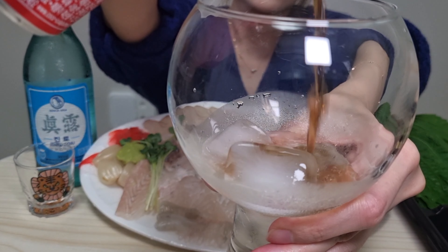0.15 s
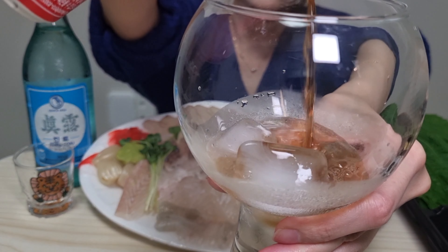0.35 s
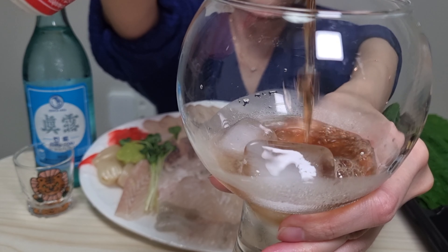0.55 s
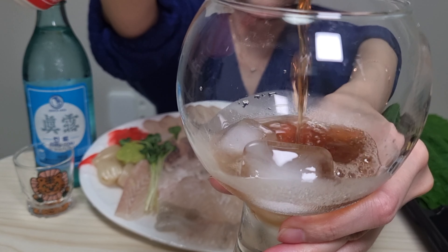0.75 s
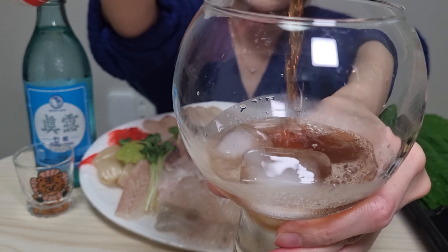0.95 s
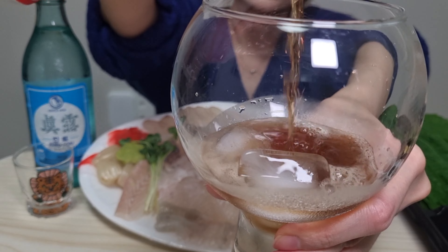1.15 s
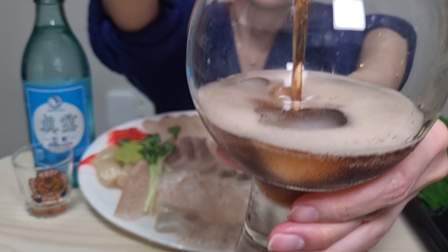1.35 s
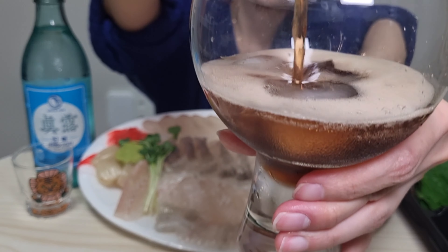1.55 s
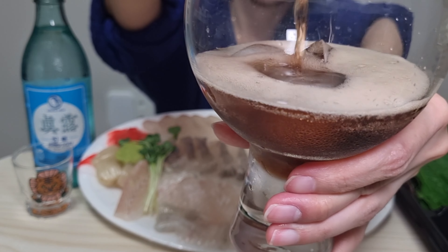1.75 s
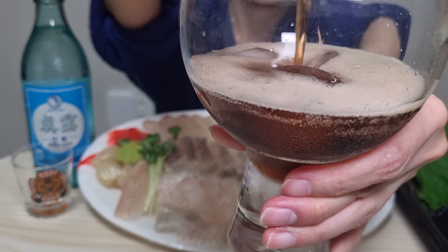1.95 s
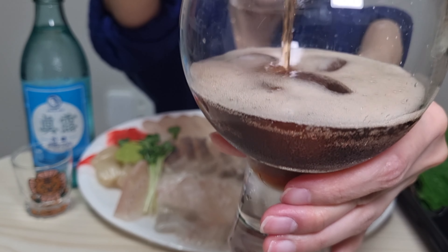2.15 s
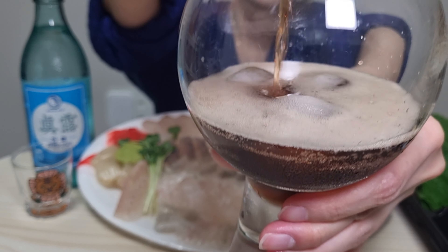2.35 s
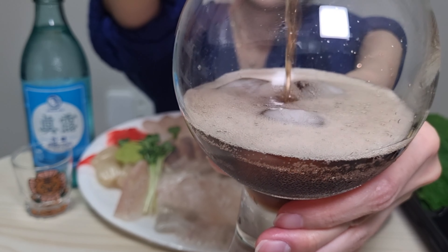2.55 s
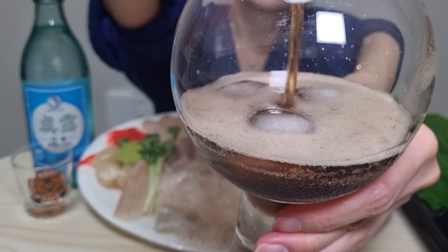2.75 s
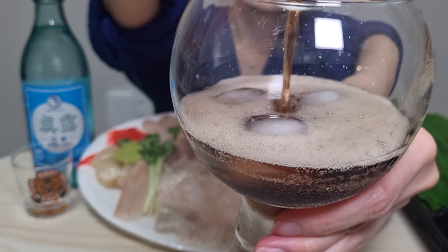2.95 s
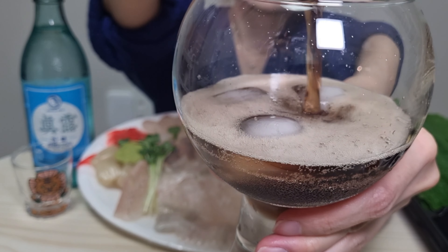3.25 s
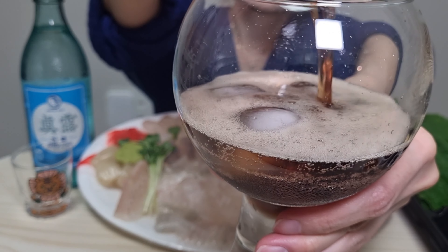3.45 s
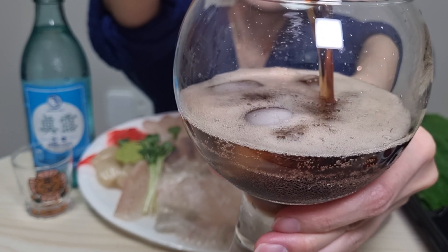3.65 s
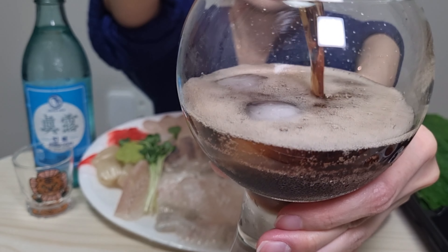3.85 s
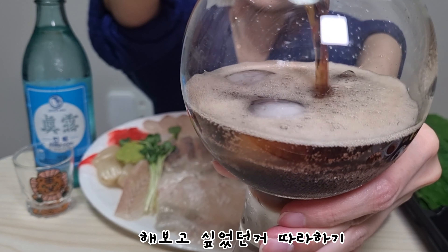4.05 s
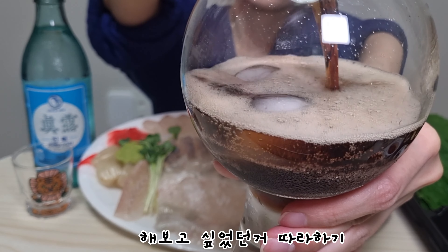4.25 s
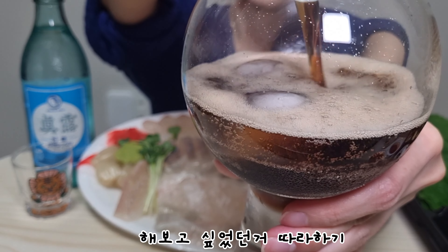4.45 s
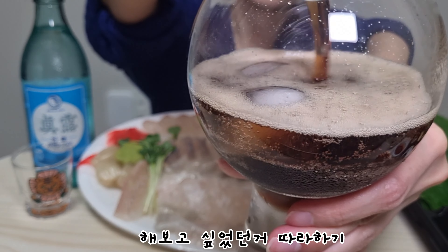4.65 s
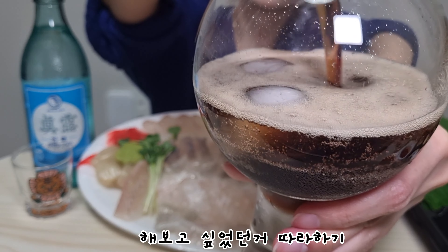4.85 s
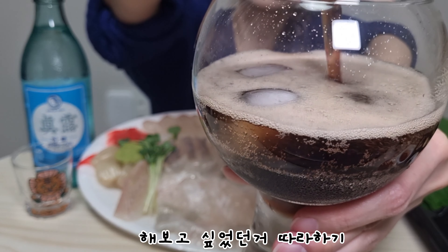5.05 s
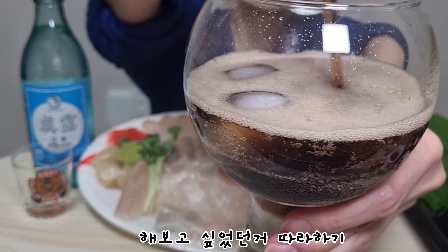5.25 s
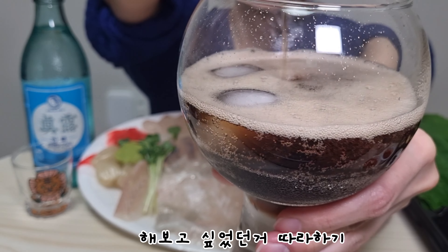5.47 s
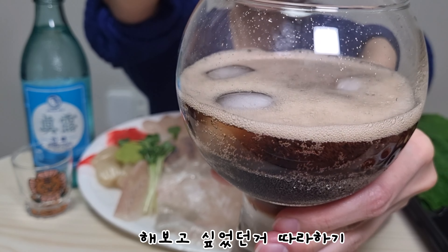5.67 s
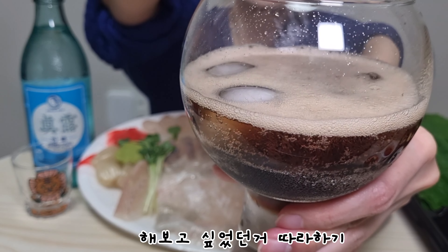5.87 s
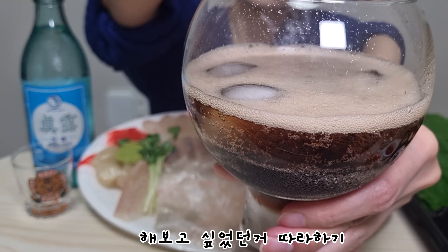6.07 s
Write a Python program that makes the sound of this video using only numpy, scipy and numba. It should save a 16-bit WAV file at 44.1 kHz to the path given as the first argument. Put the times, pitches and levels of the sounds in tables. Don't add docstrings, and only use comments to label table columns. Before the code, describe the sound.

Close stereo pickup of soda poured into a large round glass. A thin jet spatters crisply on bare ice with a hollow plop, then abruptly the sound changes to floating ice knocking the glass, a strong burst of gulping glugs and squeaky spits, and bubbling foam. Several loud clear clinks follow, then only ringing fizz remains over a faint kitchen hum.

```python
import sys
import numpy as np
from scipy import signal
from scipy.fft import rfft, irfft, next_fast_len
from scipy.io import wavfile
from numba import njit

SR = 44100
rng = np.random.default_rng(int(sys.argv[2]) if len(sys.argv) > 2 else 0)


def gain_from_db(level_db):
    decades = np.asarray(level_db, float) / 20
    return 10 ** decades


def master_out(mix):
    frames = np.transpose(np.atleast_2d(mix))
    ceiling = np.clip(frames, -1, 1)
    pcm = np.round(ceiling * 32767).astype(np.int16)
    wavfile.write(sys.argv[1], SR, pcm)


N = 335907
SECONDS = np.arange(N) / SR
CUT_S = 1.337
LAG_SAMPLES = 3.76
LEFT_RIGHT = np.array([[1], [-1]])


def rms_one(x):
    return x / np.sqrt(np.mean(x ** 2) + 1e-20)


def in_time(rows):
    s, *columns = np.transpose(rows)
    return [np.interp(SECONDS, s, c) for c in columns]


def band(x, low_hz, high_hz):
    return signal.sosfilt(signal.butter(2, [low_hz, high_hz], "band", fs=SR, output="sos"), x)


def colour(x, spectrum):
    hz, level_db = np.transpose(spectrum)
    size = next_fast_len(N)
    log_hz = np.log(np.arange(size // 2 + 1) * SR / size + 1)
    gain = gain_from_db(np.interp(log_hz, np.log(hz), level_db, -80, -80))
    return rms_one(irfft(rfft(x, size) * gain, size)[..., :N])


def drift(rate):
    r = np.exp(-80 * np.pi * rate / SR)
    slow = signal.lfilter([1], [1, -2 * r, r * r], rng.standard_normal(N // 40 + 2002))[2000:]
    return np.interp(np.arange(N) / 40, np.arange(len(slow)), rms_one(slow))


@njit
def resonate(x, hz, width_hz, sr):
    out, r = np.zeros_like(x), np.exp(-np.pi * width_hz / sr)
    for i in range(2, len(x)):
        drive = (1 - r * r) / 2 * (x[i] - x[i - 2])
        out[i] = drive + 2 * r * np.cos(2 * np.pi * hz[i] / sr) * out[i - 1] - r * r * out[i - 2]
    return out


def crackle(per_s, spread_db):
    sizes = gain_from_db(spread_db * np.minimum(rng.exponential(1, N), 5)) * rng.choice([-1., 1.], N)
    return rms_one(sizes * (rng.random(N) < per_s / SR))


def pair(near, own, alike):
    late = np.interp(np.arange(len(near)) - LAG_SAMPLES, np.arange(len(near)), near)
    alike = np.clip(alike, 0, 1)
    return np.sqrt(alike) * np.array([near, late]) + np.sqrt(1 - alike) * own


def ping(t, hz, t60, rise_s, glide=0.):
    t = np.maximum(t, 0)
    return np.sin(2 * np.pi * hz * t * (1 + glide * t)) * gain_from_db(-60 * t / t60) * (1 - np.exp(-t / rise_s))


def dying(x, t, t60):
    return x * gain_from_db(-60 * t / t60)


def add(out, s, sound):
    i = round(s * SR)
    out[:, i:i + sound.shape[1]] += sound[:, :N - i]


def event_time(length_s):
    return (np.arange(round(length_s * SR)) - np.array([[0], [LAG_SAMPLES]])) / SR


def swell(start_s, attack_s, end_s, release_s, boost_db):
    lengths_s = [start_s, abs(attack_s), abs(end_s - start_s - attack_s), abs(release_s)]
    return np.interp(SECONDS, np.cumsum(lengths_s), [0, boost_db, boost_db, 0])


# (frequency [Hz], density [dB per Hz])
ROOM_AIR = [(12, -72), (20, -36), (27, -36), (42, -19.5), (64, -16), (87, -19), (106, 11), (119, -13),
            (363, -18), (595, -28.5), (900, -17), (1170, -37.5), (1980, -120)]
# (frequency [Hz], width [Hz], level [dB])
FRIDGE = [(93.2, 3.84, -54), (60, 13, -66)]


def kitchen():
    right = gain_from_db(-3.2 * LEFT_RIGHT)
    out = gain_from_db(-62.5) * colour(pair(rng.standard_normal(N), rng.standard_normal((2, N)), 0.14), ROOM_AIR)
    (hum_hz, wobble_hz, hum_db), (rumble_hz, width_hz, rumble_db) = FRIDGE
    turns = np.cumsum(hum_hz + wobble_hz * drift(6)) / SR
    out += right * gain_from_db(hum_db + 2.2 * drift(40)) * np.sin(2 * np.pi * turns)
    rumble = pair(rng.standard_normal(N), rng.standard_normal((2, N)), 0.81)
    return out + right * gain_from_db(rumble_db) * rms_one(band(rumble, rumble_hz - width_hz, rumble_hz + width_hz))


def follow(foam_db, mean_db, share, db_per_s):
    return mean_db + share * (foam_db + 46) + db_per_s * (SECONDS - 4)


# (time [s], level [dB])
FOAM_LEVEL = [(1.34, -54), (2.2, -53), (2.42, -34), (2.6, -40), (3.1, -45), (3.85, -45.5), (4.05, -51.5),
              (4.7, -48), (5.1, -44), (6.1, -41), (6.8, -43.5), (7.62, -47.5)]
# (time [s], pitch [Hz])
AIR_RISES = [(2.6, 935), (4.8, 1072)]
# (frequency [Hz], width [Hz], level [dB])
BOWL_MODES = [(1070, 116, 0), (1600, 300, -9.5), (2250, 67, -1), (3290, 370, -10), (4340, 240, -23.5)]
# (time [s], pitch [Hz])
UPPER_SHIFT = [(1.4, 2250), (2, 2180), (3.2, 2160), (5.3, 2220), (7.6, 2200)]
# (level at mean foam level [dB], share of its swing, thickening head [dB per s])
UPPER_FOLLOWS = (-48.5, .4, -.8)
HISS_FOLLOWS = (-50, .2, -.3)
# (frequency [Hz], density [dB per Hz])
FIZZ = [(540, -34), (760, -16), (1300, -12), (1670, -10.5), (2220, 0.5), (2520, -6), (4080, -12),
        (8170, -14), (10600, -19), (12600, -13.5), (14900, -18), (16000, -13)]


def foam():
    (air_hz,), (bowl_db,) = in_time(AIR_RISES), in_time(FOAM_LEVEL)
    upper_db, hiss_db = follow(bowl_db, *UPPER_FOLLOWS), follow(bowl_db, *HISS_FOLLOWS)
    pops = pair(crackle(1600, 2.8), rng.standard_normal((2, N)), 0.45)
    fine = pair(crackle(4000, 3.5), rng.standard_normal((2, N)), 0.51)
    (_, width_hz, _), *upper = BOWL_MODES
    wide_hz = 2 * width_hz
    bowl = np.array([resonate(resonate(x, air_hz, wide_hz, SR), air_hz, wide_hz, SR) for x in pops])
    shift = in_time(UPPER_SHIFT)[0] / upper[1][0]
    ring = np.zeros((2, N))
    for k, (hz, mode_width_hz, level_db) in enumerate(upper):
        mode = np.array([resonate(x, hz * shift, mode_width_hz, SR) for x in fine])
        ring += gain_from_db(level_db) * (-1) ** k * mode
    hiss = colour(pair(crackle(7000, 2.7), rng.standard_normal((2, N)), 0.1), FIZZ)
    out = gain_from_db(bowl_db + 1.3 * drift(9)) * rms_one(bowl)
    out += gain_from_db(upper_db - 0.5 + 2.3 * drift(26.2)) * rms_one(ring)
    out += gain_from_db(hiss_db + 5.5 + 0.89 * drift(25)) * hiss
    return out * np.clip((SECONDS - CUT_S) / 0.012, 0, 1)


# (time [s], pitch [Hz])
NECK = [(1.63, 409), (1.9, 445), (2.25, 560), (2.47, 719), (2.57, 759), (2.68, 570), (2.9, 405),
        (3.01, 390), (3.1, 350), (3.36, 340), (3.8, 385), (4.44, 402), (4.58, 435), (5.4, 465)]
# (time [s], level [dB])
GULPED_AIR = [(2.3, -72), (2.4, -40), (2.5, -36), (2.64, -42), (2.8, -45), (2.85, -53), (2.89, -45),
              (3.01, -46), (3.04, -64), (3.5, -63), (3.85, -62), (3.95, -80), (4.25, -82)]
# (time [s], level [dB])
UPPER_WAKES = [(2.42, -24), (2.63, 2), (2.9, -2), (3.1, 6), (3.5, 3), (3.85, 7), (3.95, 22)]


def gurgle():
    (neck_hz,), (level_db,), (upper_db,) = in_time(NECK), in_time(GULPED_AIR), in_time(UPPER_WAKES)
    neck_hz = neck_hz * (1 + .04 * np.sign(drift(9)) * np.abs(drift(4)))
    gulps = crackle(400, 2.8) * gain_from_db(1.6 * drift(22))
    first = rms_one(resonate(resonate(gulps, neck_hz, 38.0, SR), neck_hz, 75.0, SR))
    upper_hz = neck_hz * np.interp(SECONDS, [3.15, 3.5], [2.05, 1.7])
    second = rms_one(resonate(resonate(gulps, upper_hz, 63.0, SR), upper_hz, 140.0, SR))
    sound = gain_from_db(level_db) * first + gain_from_db(level_db + upper_db) * second
    sound *= np.interp(SECONDS, [2.28, 2.33, 4.22, 4.4], [0, 1, 1, 0])
    return np.array([sound, np.roll(sound, 11)])


# (time [s], length [s], centre [Hz], level [dB])
SQUEAKS = [(2.342, 0.058, 8600, -40), (2.405, .06, 8500, -37), (2.47, 0.063, 9000, -33),
           (2.661, .04, 6500, -41.5), (2.733, 0.045, 6500, -40), (2.78, 0.05, 6900, -41),
           (3.195, 0.05, 310, -50), (3.22, 0.08, 255, -52), (3.275, 0.065, 330, -51), (3.29, .06, 250, -52),
           (3.14, 0.04, 350, -52)]


def squeaks():
    out, grit = np.zeros((2, N)), crackle(900, 4.0)
    for s, length_s, hz, level_db in SQUEAKS:
        t, i = event_time(length_s), round(s * SR)
        sputter = pair(grit[i:i + t.shape[1]], rng.standard_normal(t.shape), 0.6)
        add(out, s, gain_from_db(level_db - 11 * t / length_s) * rms_one(band(sputter, 0.93 * hz, 1.06 * hz)))
    return out


# (time [s], peak [dB], pitch [Hz])
BUBBLES = [(2.3687, -28, 2210), (2.3846, -22, 1470), (2.431, -28, 1600), (2.461, -28, 2220),
           (2.5123, -29, 1480), (2.5378, -30, 1330), (2.5533, -28, 1400), (2.578, -30, 1000),
           (2.5917, -28, 2090), (2.6371, -25, 1600), (2.6525, -23, 1770), (2.6929, -30, 1450),
           (2.798, -30, 1400), (2.8815, -31, 1600), (2.927, -33, 1400), (2.9948, -33, 1350),
           (3.008, -34, 1400), (3.0905, -25, 1500), (3.117, -33, 1450), (3.14, -34, 950),
           (3.208, -34, 1000), (3.226, -35, 1000), (3.243, -35, 850), (3.311, -31, 1000),
           (3.311, -36, 2150), (3.339, -36, 1600), (1.957, -31, 930), (1.94, -33, 950), (4.105, -36, 700),
           (5.466, -26, 1000), (4.33, -22, 960), (4.339, -26, 1000), (4.377, -20, 1020), (4.449, -21, 1050),
           (3.916, -17, 960)]


def bubbles():
    out, t = np.zeros((2, N)), event_time(0.22)
    for s, peak_db, hz in BUBBLES:
        add(out, s, gain_from_db(peak_db + 3) * ping(t, hz, 0.028, 0.0012, glide=2.5))
    return out


# (time [s], peak [dB], centre [Hz])
SPITS = [(2.325, -36, 13000), (2.386, -34, 6200), (2.408, -33, 6300), (2.431, -36, 7000),
         (2.45, -36, 13000), (2.474, -30, 9500), (2.485, -34, 14000), (2.512, -34, 13500),
         (2.727, -37, 11000), (2.733, -31, 6600), (2.782, -35, 6800), (2.808, -35, 13000)]


def spits():
    out, t = np.zeros((2, N)), event_time(0.02)
    for s, peak_db, hz in SPITS:
        spit = band(dying(rng.standard_normal(t.shape), t, 0.012), 0.8 * hz, min(1.2 * hz, 17000))
        add(out, s, gain_from_db(peak_db + 9) * spit)
    return out


# (time [s], ring [dB], pitch [Hz], click against ring [dB], rise [per s])
TICKS = [
    (.336, -27, 1050, -40, 35),
    (.378, -16, 2250, -40, 22),
    (1.319, -48, 400, 21, 0),
    (2.409, -29, 3200, 9, 0),
    (3.052, -50, 9000, 27, 0),
    (4.397, -24, 2600, 3, 0),
    (4.589, -31, 5400, -30, 0),
]


def ticks():
    out, t = np.zeros((2, N)), event_time(0.22)
    for s, peak_db, hz, click_db, glide in TICKS:
        click = band(dying(rng.standard_normal(t.shape), t, .004), 400, 16000)
        add(out, s, gain_from_db(peak_db) * (ping(t[:1], hz, .04, .001, glide) + gain_from_db(click_db) * click))
    return out


# (time [s], thin ring [dB], wall mode [dB], click [dB], thud [dB])
HARD_BLOWS = [
    (1.902, -60, -45, -20, -50),
    (3.904, -29, -22, -8, -12),
    (4.317, -48, -36, -32, -22),
    (4.398, -35, -36, -30, -40),
    (4.442, -50, -30, -27, -27),
    (4.589, -45, -45, -30, -36),
    (5.43, -37, -30, -6, -13),
]


def glass():
    out, t = np.zeros((2, N)), event_time(0.22)
    click = ping(t, 1550, 0.012, 0.0004) + 0.4 * ping(t, 2800, 0.008, 0.0003)
    click += 0.35 * ping(t, 3750, 0.008, 0.0003)
    for s, thin_db, wall_db, click_db, thud_db in HARD_BLOWS:
        sound = gain_from_db(thin_db) * ping(t, 4366, 0.24, 0.002) + gain_from_db(wall_db) * ping(t, 727, 0.15, 0.002)
        sound += gain_from_db(click_db) * click + gain_from_db(thud_db) * ping(t, 570, 0.03, 0.0015)
        add(out, s - .0005, sound)
    return out


def knock(t, hz, crack_db, t60, tail_db, glide=0., soft_s=.0008):
    luck = rng.normal(0, 1, 3)
    sound = ping(t, hz, t60, 0.0016, glide)
    sound += gain_from_db(-8.5) * ping(t, hz * (1.12 + 0.04 * luck[0]), 0.78 * t60, 0.0029)
    sound *= 1 - np.exp(-np.maximum(t, 0) / soft_s)
    rough = pair(rng.standard_normal(t.shape[1]), rng.standard_normal(t.shape), 0.57)
    sound += gain_from_db(tail_db) * band(dying(rough, t, 0.15) * (t > .003), 0.88 * hz, 1.283 * hz)
    snap = band(dying(rough, t, 0.017), 1300, 2780)
    snap += gain_from_db(-14.5) * band(dying(rough, t, 0.0017), 2100, 9200)
    snap += gain_from_db(-11) * ping(t, 1550 + 100 * luck[2], 0.018, 0.001)
    lean_db = (.5 * luck[1] - .5) * LEFT_RIGHT
    return band(sound + gain_from_db(crack_db + 12) * snap, 480, 15000) * gain_from_db(lean_db)


# (time [s], peak [dB], pitch [Hz])
GLUGS = [(2.351, -24, 904), (2.362, -26, 939), (2.369, -21, 950), (2.375, -10, 958), (2.386, -8, 960),
         (2.408, -12, 907), (2.428, -21, 956), (2.436, -22, 900), (2.4615, -12, 730), (2.472, -18, 743),
         (2.498, -24, 894), (2.512, -19, 786), (2.538, -15.5, 778), (2.556, -19, 762), (2.592, -25, 1080),
         (2.63, -16, 977), (2.637, -20, 1040), (2.652, -20, 1120), (2.711, -21, 950), (2.725, -22, 888),
         (2.751, -27, 961), (2.785, -26, 918), (2.797, -27, 910), (2.908, -33, 966), (2.925, -25.5, 783),
         (2.954, -32, 802), (2.972, -27, 748), (2.996, -26, 807), (3.008, -28, 724), (3.023, -30, 724),
         (3.046, -26, 960), (3.047, -31, 720), (3.073, -33, 760), (3.091, -29, 740), (3.115, -31, 900)]


def glugs():
    out, t = np.zeros((2, N)), event_time(0.22)
    for s, peak_db, hz in GLUGS:
        crack_db = -22.5 - .5 * peak_db
        add(out, s - .001, gain_from_db(peak_db + 9.5) * knock(t, hz, crack_db - 14, 0.031, tail_db=-16, soft_s=.0025))
    return out


def late_right(t):
    return t - np.array([[0], [.0002]])


# (time [s], peak [dB], bowl pitch [Hz], low mode [dB], crack [dB])
KNOCKS = [(1.492, -31, 990, -42, 5), (1.523, -32, 1050, -36, 3.5), (1.634, -17.5, 903, -23, -21),
          (1.78, -24.5, 974, -39, -33), (1.814, -32, 960, -41, -25), (1.843, -29.5, 960, -46, -23),
          (1.884, -18.5, 910, -26, -10), (1.902, -6.5, 935, -33, -14.5),
          (1.987, -17, 930, -36, -15), (2.025, -30, 950, -30, -25), (2.199, -13, 994, -16, -13),
          (2.234, -23, 964, -27, -11), (2.276, -7.5, 921, -16.5, -30), (2.31, -7, 1070, -18, -15),
          (2.695, -9.5, 963, -25, -26), (2.808, -11.5, 902, -19, -12),
          (2.883, -13, 898, -26, -20.5), (3.09, -16.5, 1070, -24.5, -11),
          (3.488, -25, 1028, -24, -20), (3.781, -25, 970, -21, -18), (3.882, -27, 1046, -18, -14),
               (3.905, 2, 975, -23.5, -16), (4.147, -33.5, 1010, -40, -12), (4.229, -27, 1003, -42, -14),
               (4.317, -7, 1000, -20.5, -23), (4.371, -18, 1002, -28, -23), (4.398, 5, 1040, -32, -27),
               (4.442, -12, 1070, -17, -16), (4.588, -10, 988, -18.5, -22), (4.884, -28, 982, -43, -9),
               (5.102, -28, 1060, -45, -23), (5.430, 4, 1000, -18, -21), (5.821, -13.5, 974, -49, -19),
               (5.888, -21, 970, -45, -18), (5.963, -22, 974, -46, -18)]
# (frequency [Hz], level [dB], t60 [s])
GLASS_MODES = [(640, -24, .05), (974, -10, .12), (1050, -10, .12), (1450, -14, .035), (2218, -26, .07),
               (4370, -56, .15)]
# (time [s], level [dB])
FULL_RING = [(4.6, -40), (5.8, -19)]


def ice_knocks():
    out, t = np.zeros((2, N)), event_time(0.22)
    skew = late_right(t)
    for s, peak_db, bowl_hz, low_db, crack_db in KNOCKS:
        low_hz = np.interp(s, *np.transpose(NECK))
        sound = knock(t, bowl_hz, crack_db, 0.045, tail_db=-5.5)
        low_noise = dying(rng.standard_normal(t.shape[1]), t, 0.14)
        sound += gain_from_db(low_db + 12) * band(low_noise, 0.85 * low_hz, 1.2 * low_hz)
        low = ping(skew, low_hz, 0.135, 0.0034) + .35 * ping(t - .003, 1.1 * low_hz, 0.11, 0.0056)
        low += .8 * ping(skew, 0.86 * low_hz, 0.11, 0.008)
        sound += gain_from_db(low_db - 5) * low
        luck = rng.normal(0, 1, (len(GLASS_MODES), 2))
        for (hz, level_db, t60), (both, side) in zip(GLASS_MODES, luck):
            uneven_db = 2 * both + .8 * side * LEFT_RIGHT
            sound += gain_from_db(level_db - 5 + uneven_db) * ping(skew, hz, t60, 0.00097)
        sound += gain_from_db(np.interp(s, *np.transpose(FULL_RING))) * ping(skew, 720, 0.16, 0.003)
        hard = gain_from_db(3.1 * min(peak_db, 0) + min(low_db + 23, 0))
        sound += hard * gain_from_db(-31) * ping(t, 260, 0.018, 0.0011)
        sound += hard * gain_from_db(-20) * band(dying(rng.standard_normal(t.shape), t, 0.0045), 1100, 4250)
        sound += hard * gain_from_db(-18) * band(dying(rng.standard_normal(t.shape), t, 0.19), 520, 900)
        add(out, s - .001, gain_from_db(peak_db + .8) * sound)
    return out


# (time [s], peak [dB], pitch [Hz])
PLOPS = [(0.161, -26.5, 1220), (0.289, 2.5, 820), (0.301, -10, 796), (0.315, -13, 744), (0.325, -9, 725),
         (0.342, -16, 577), (0.359, -24, 556), (0.384, -26, 690), (0.402, -29, 974), (0.432, -18, 730),
         (0.444, -31, 750), (0.454, -19, 1160), (0.469, -26.5, 710), (0.492, -29.5, 1400),
         (0.527, -26.5, 1640)]


def plops():
    out, t = np.zeros((2, N)), late_right(event_time(0.22))
    for s, peak_db, hz in PLOPS:
        upper_db = -30 - .7 * peak_db
        sound = knock(t, hz, upper_db - 3, .024, tail_db=-11, glide=13.6, soft_s=.002)
        add(out, s - .001, gain_from_db(peak_db + 8.5) * sound)
    return out


# (time [s], peak [dB], pitch [Hz])
DROPS = [(0.0917, -32.5, 3300), (0.1085, -22, 2320), (0.207, -32, 2210), (0.2734, -18, 3190),
         (0.3147, -19, 3350), (0.3634, -16, 2290), (0.3801, -12, 2830), (0.433, -27, 2190),
         (0.5135, -26.5, 2240), (0.5981, -31, 3290), (0.6968, -29.5, 3750), (0.714, -32, 2285),
         (0.8327, -27, 4280), (0.9019, -28, 3650), (0.9575, -30, 2240), (1.0012, -26, 3500),
         (1.079, -24.5, 2300), (1.1399, -35, 2230), (1.282, -29, 4270), (0.93, -30, 5516),
         (0.965, -32, 5600), (1.137, -30, 5560), (1.18, -33, 5500), (0.9, -31, 2950), (0.962, -29, 3100),
         (1.0, -30, 2650)]


def drops():
    out, t = np.zeros((2, N)), event_time(0.061)
    for s, peak_db, hz in DROPS:
        t60 = max(.015 - .001 * peak_db, .005)
        noise = dying(rng.standard_normal(t.shape), t, 3.6 * t60)
        sound = ping(t, hz, t60, 0.0017) + gain_from_db(2.5) * band(noise, 0.947 * hz, 1.08 * hz)
        add(out, s - .001, gain_from_db(peak_db + np.array([[5], [-.8]])) * sound)
    return out


# (time [s], peak [dB], centre [Hz])
SPATTERS = [(0.1476, -24, 4550), (0.2397, -25, 7350), (0.2614, -19.5, 6430), (0.2767, -18, 6950),
            (0.3006, -15, 13300), (0.3407, -20, 7540), (0.3803, -22, 10400), (0.405, -21, 7800),
            (0.5128, -24, 9200), (0.5293, -24, 8200), (0.6, -15, 12200), (0.643, -16, 14500),
            (0.6954, -19.5, 14800), (0.7123, -24, 6100), (0.7398, -17, 9000), (0.763, -19, 8200),
            (0.8302, -17.5, 10700), (0.8708, -16, 15100), (0.9269, -21, 5260), (0.9569, -14, 11000),
            (0.9916, -17, 12400), (1.036, -20.5, 6230), (1.074, -18, 11400), (1.0972, -15, 11500),
            (1.1394, -19, 9500), (1.18, -19, 8150), (1.2296, -18, 11500), (1.251, -16, 7040),
            (1.2872, -14, 12200), (1.3196, -17, 9450), (0.2166, -28, 7470), (0.466, -26, 5490),
            (0.5403, -20, 9040), (0.6755, -24, 5340), (0.8486, -20, 11900), (0.901, -23, 12600),
            (0.947, -20, 6500), (1.1649, -21, 7000), (1.21, -25, 8000), (1.27, -24, 6000)]


def spatters(wet):
    out, t = np.zeros((2, N)), event_time(0.061)
    wet = np.pad(wet, ((0, 0), (0, t.shape[1])), "wrap")
    shape = (gain_from_db(3.0 - 60 * t / 0.008) + gain_from_db(-13.5 - 60 * t / 0.15)) * np.clip(t / 0.0011, 0, 1)
    for (s, peak_db, hz), pan_db in zip(SPATTERS, rng.normal(0, 2.3, len(SPATTERS))):
        i = round(s * SR)
        burst = wet[:, i:i + t.shape[1]] * shape
        sound = gain_from_db(-10 - 5 * np.log2(hz / 8000)) * burst
        sound += gain_from_db(-0.5) * band(burst, 0.77 * hz, min(1.29 * hz, 17000))
        add(out, s - .001, gain_from_db(peak_db + pan_db * LEFT_RIGHT) * sound)
    return out


JET_DB = -36
# (lands [s], thins for [s], depth [dB])
BREAKS = [
    (.105, .08, 17),
    (.205, .04, 3),
    (.3, .08, 4),
    (.596, .07, 4),
    (.828, .06, 14),
    (1.03, .1, 5),
    (1.228, .03, 9),
    (1.283, .03, 4),
]


def jet():
    return JET_DB - sum(swell(s - 1.5 * thin_s, thin_s, s, .012, depth_db) for s, thin_s, depth_db in BREAKS)


# (start [s], attack [s], end [s], release [s], boost [dB])
TRICKLE_SPLASH = (.24, .05, .53, .05, 14)


def trickle():
    level_db = -58.5 + .6 * (jet() - JET_DB) + swell(*TRICKLE_SPLASH)
    water = pair(crackle(230, 5.5), rng.standard_normal((2, N)), 0.2)
    return gain_from_db(level_db + 3.8 * drift(25)) * rms_one(band(band(water, 560, 1250), 430, 1000))


# (start [s], attack [s], end [s], release [s], boost [dB])
BODY_SPLASH = (.1, .1, .46, .11, 15.5)
# (start [s], attack [s], end [s], release [s], boost [dB])
BODY_LULL = (1.185, .025, 1.277, .004, -11)


def spray(wet):
    spray_db = jet()
    body_db = spray_db - 18 + swell(*BODY_SPLASH) + swell(*BODY_LULL)
    clumps_db = 4.0 * drift(60)
    out, edges, size = np.zeros((2, N)), np.geomspace(1900, 16500, 13), wet.shape[1]
    for low_hz, high_hz in zip(edges, edges[1:]):
        level_db = spray_db + 2 if low_hz > 4500 else body_db + 13.5
        level_db = level_db + 2.8 * drift(12) + 2.2 * drift(40) + clumps_db
        out[:, :size] += gain_from_db(level_db)[:size] * band(wet, low_hz, high_hz)
    return out


# (frequency [Hz], density [dB per Hz])
SPRAY_COLOUR = [(1060, -64.5), (1800, -45), (2120, -32), (2250, 5), (2370, -7.5), (2500, -5.5), (3570, 1.5),
                (4790, -6), (5440, 1), (9000, -3), (10400, -6), (12600, -3), (15100, -3.5), (16000, -9)]


def stream():
    clicks = pair(crackle(3500, 3.3), np.array([crackle(4000, 3.5), crackle(4000, 3.3)]), 0.42)
    wet = colour(clicks, SPRAY_COLOUR)[:, :round(CUT_S * SR)]
    out = spray(wet) + trickle() + spatters(wet) + drops()
    return out * np.clip((CUT_S - SECONDS) / 0.0068, 0, 1)


def scene():
    bottle = gurgle() + squeaks() + bubbles() + spits()
    ice = ticks() + glass() + glugs() + ice_knocks() + plops()
    return kitchen() + foam() + bottle + ice + stream()


def low_pass(x):
    return signal.sosfilt(signal.butter(12, 16680, fs=SR, output="sos"), x)


def record(dry):
    over_db = 0.71 * np.maximum(20 * np.log10(np.abs(dry).max(axis=0) + 1e-9) + 6, 0)
    ramp = 30 * SECONDS
    held_db = np.maximum.accumulate(over_db + ramp) - ramp
    duck_db = signal.lfilter([.008], [1, -.992], held_db)
    ducked = np.clip(dry * gain_from_db(-duck_db), -1, 1)
    dull = signal.sosfilt(signal.cheby2(10, 50, 16600, fs=SR, output="sos"), ducked)
    return low_pass(dull)


dry = scene()
out = record(dry)
master_out(out)
```